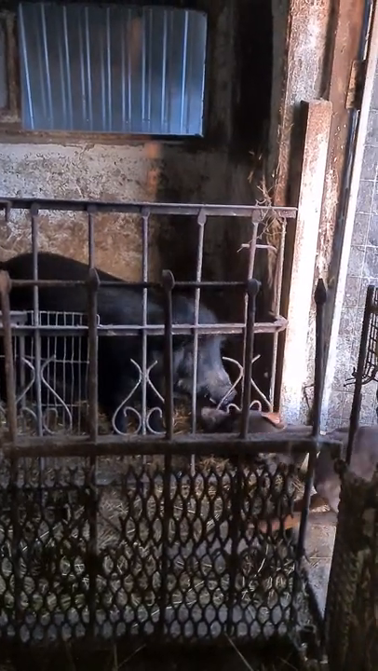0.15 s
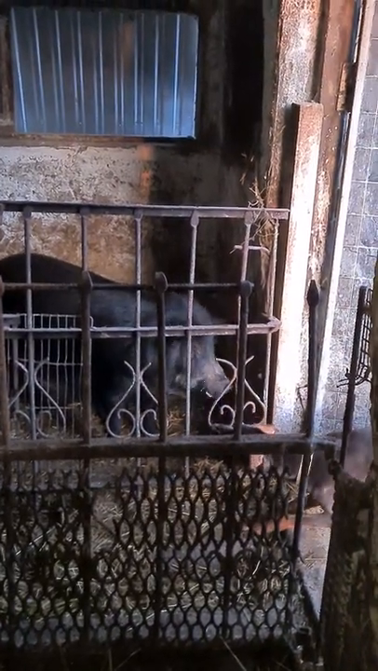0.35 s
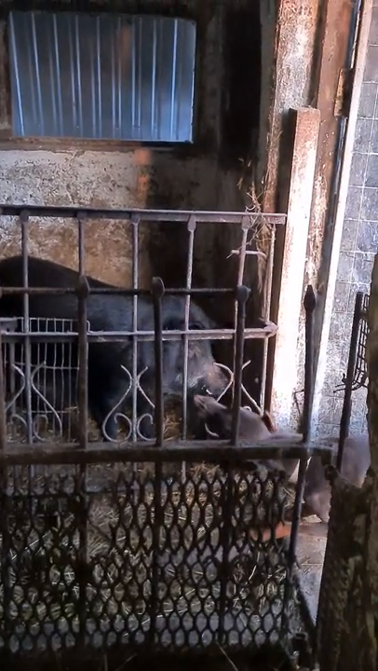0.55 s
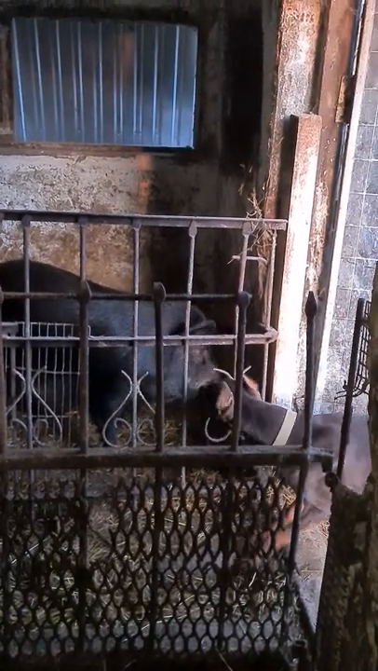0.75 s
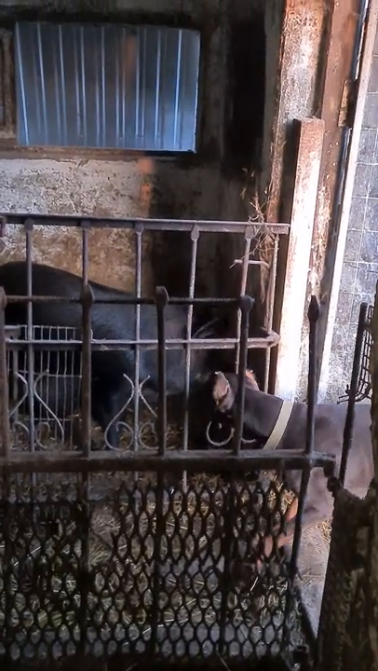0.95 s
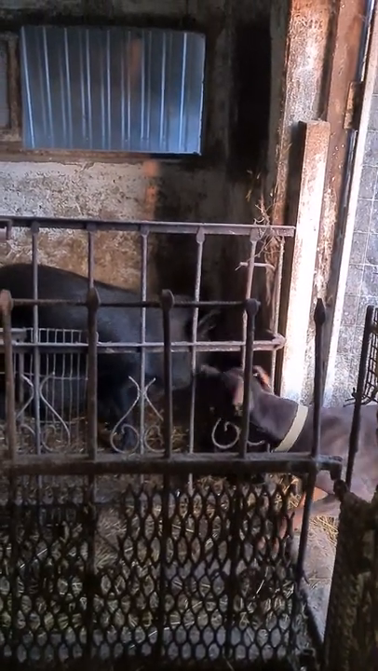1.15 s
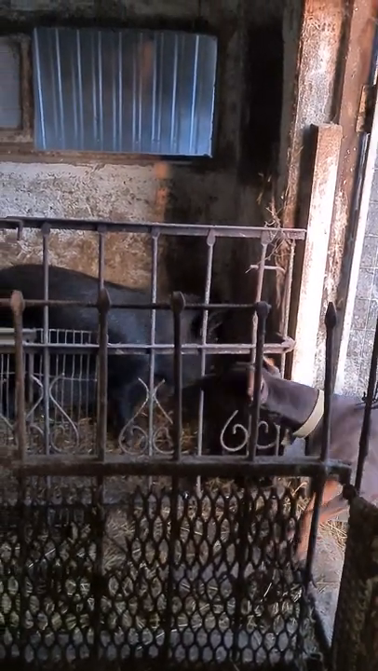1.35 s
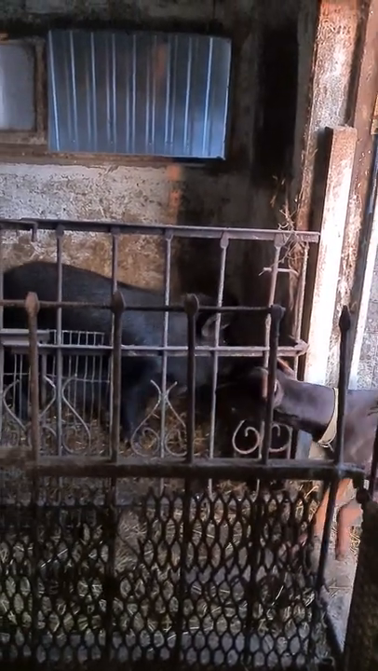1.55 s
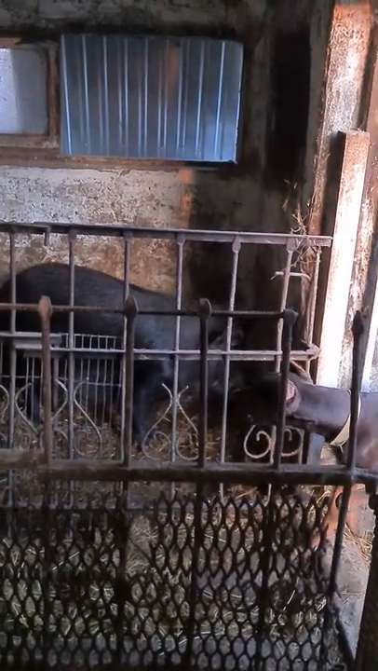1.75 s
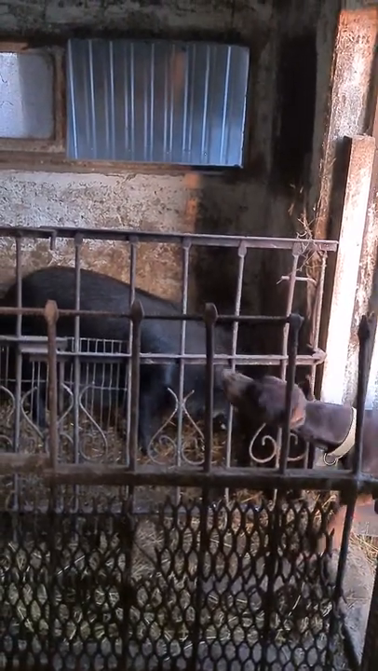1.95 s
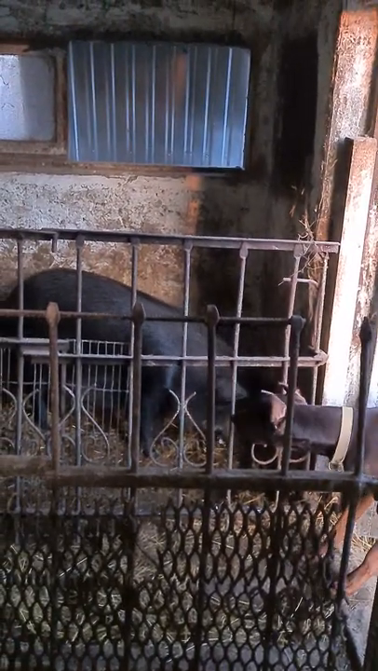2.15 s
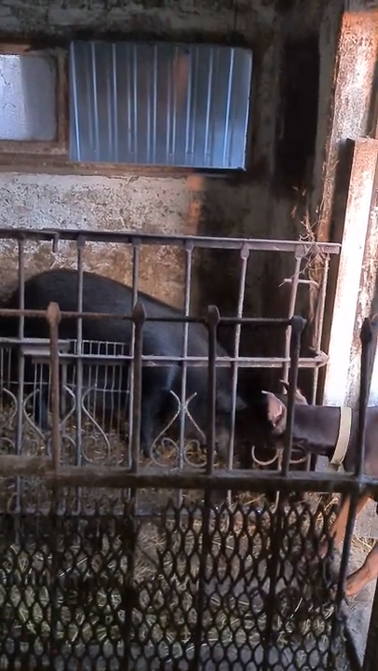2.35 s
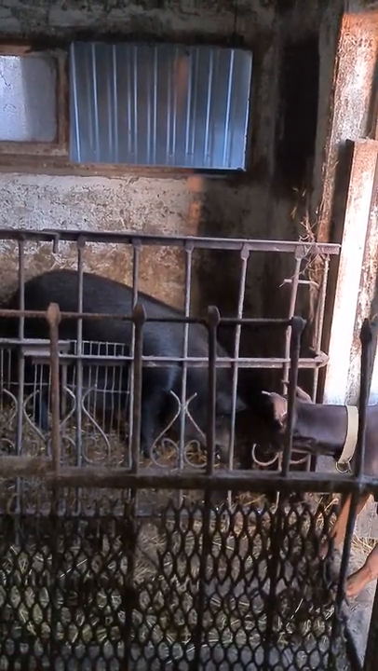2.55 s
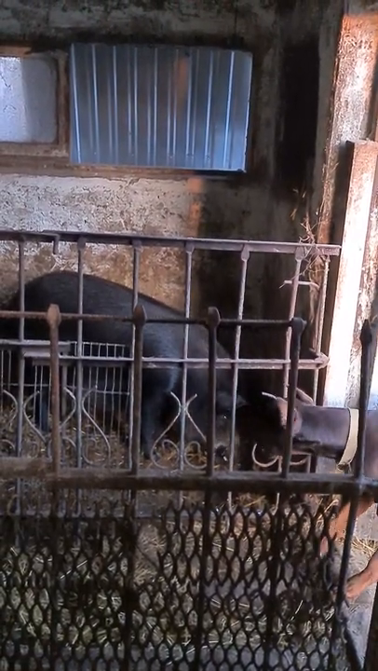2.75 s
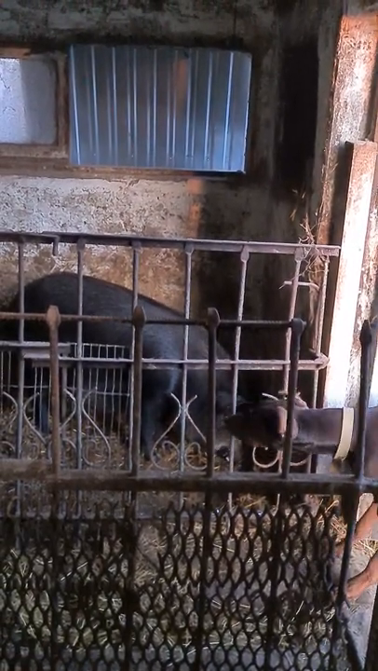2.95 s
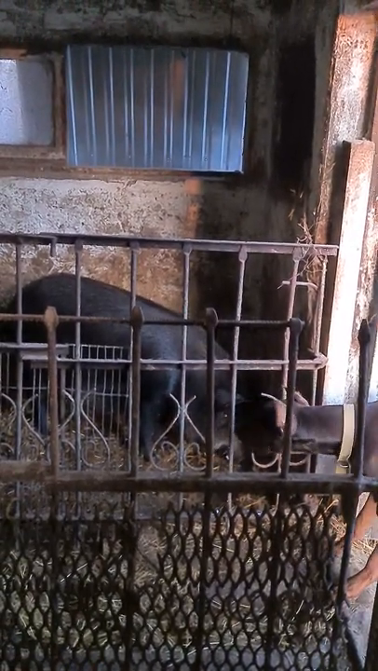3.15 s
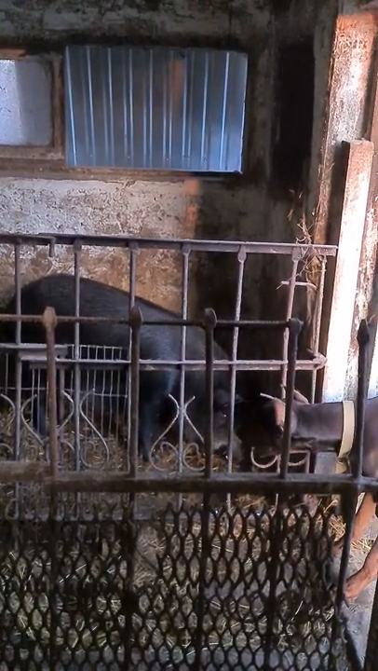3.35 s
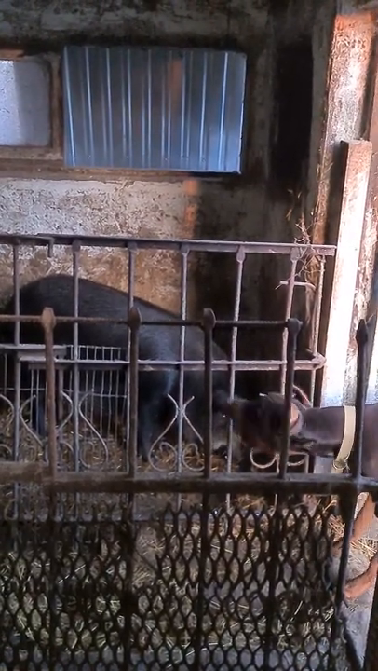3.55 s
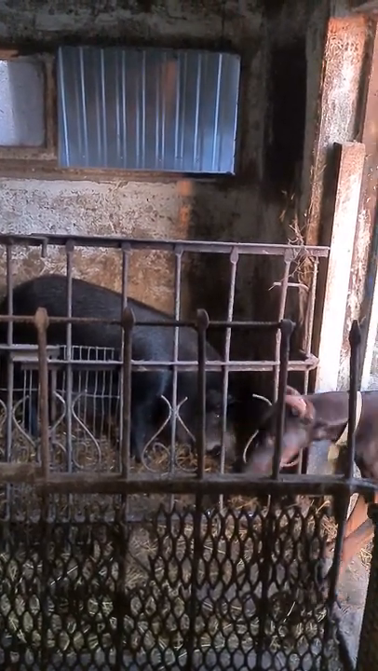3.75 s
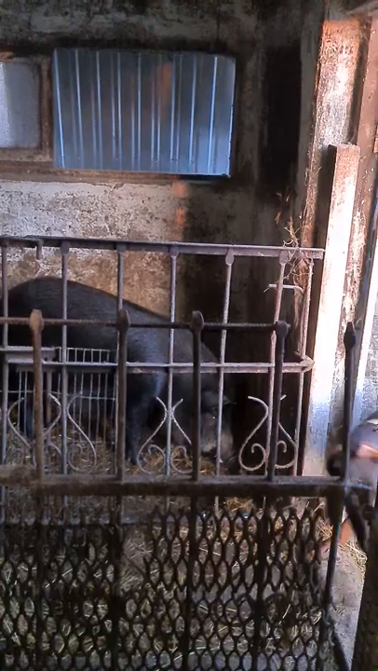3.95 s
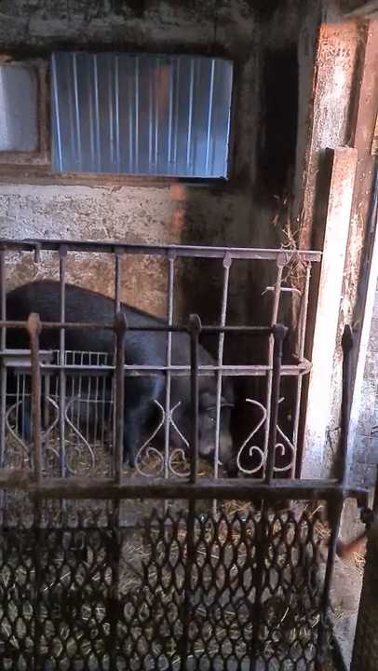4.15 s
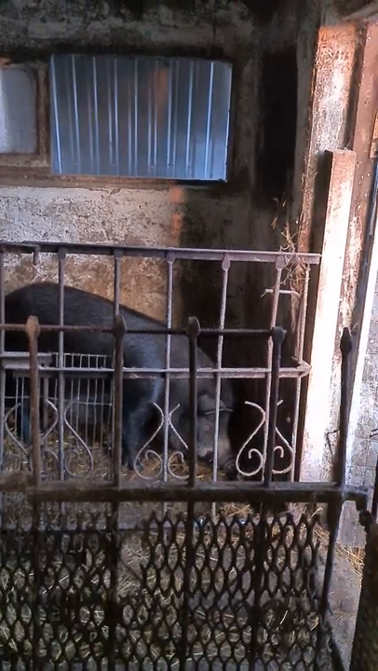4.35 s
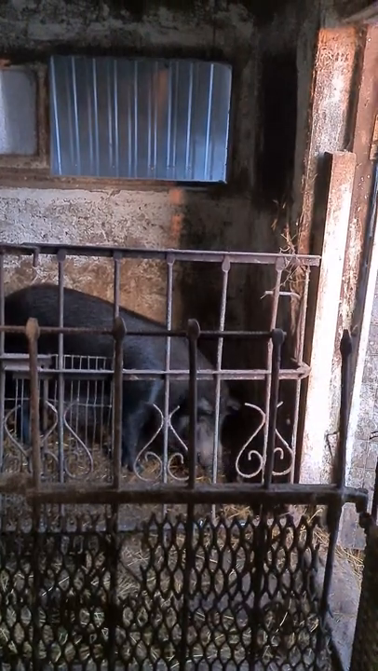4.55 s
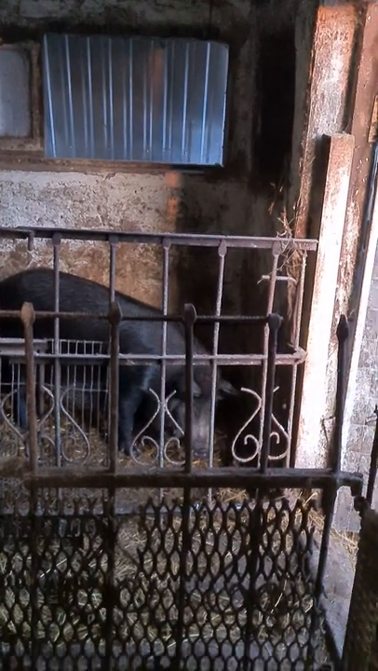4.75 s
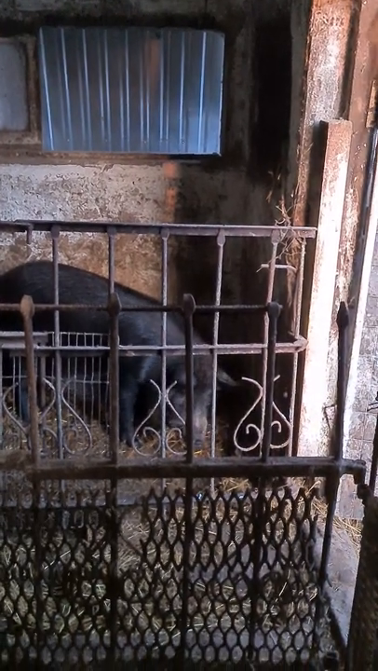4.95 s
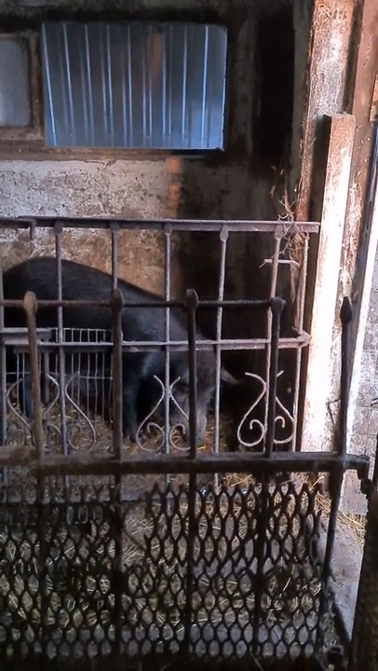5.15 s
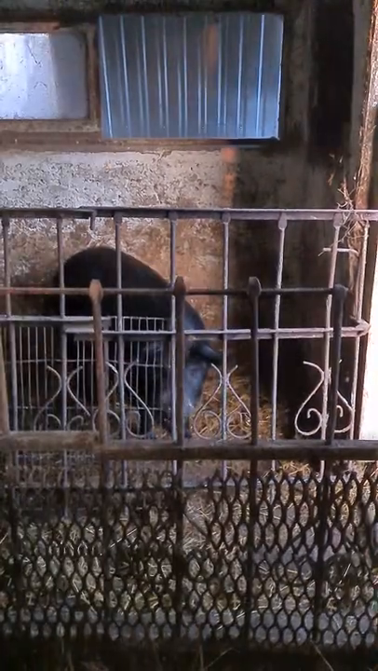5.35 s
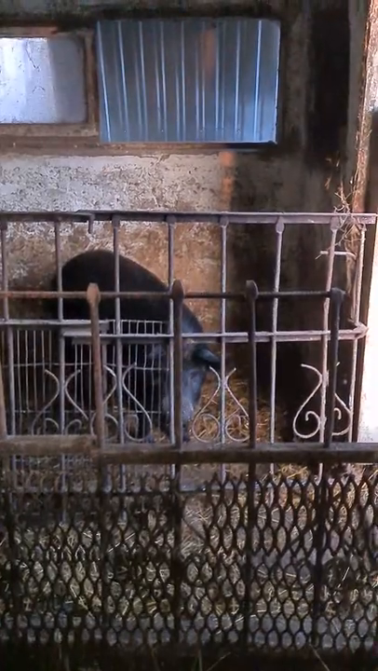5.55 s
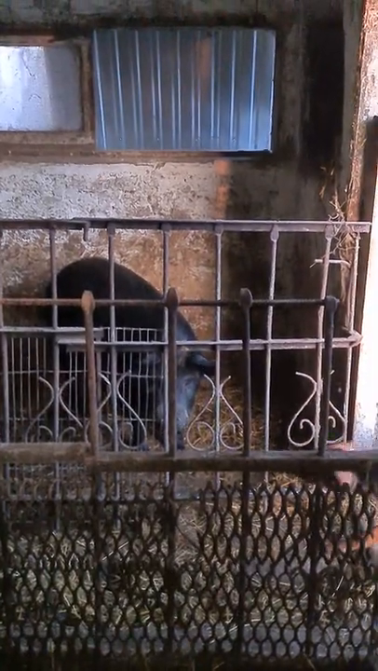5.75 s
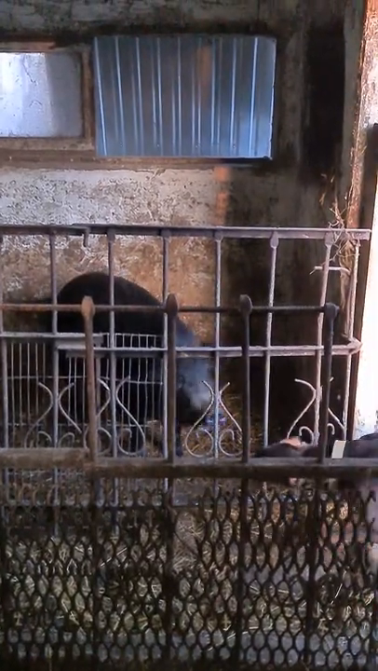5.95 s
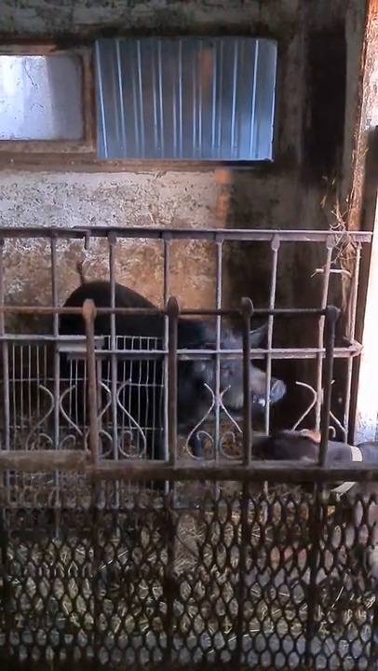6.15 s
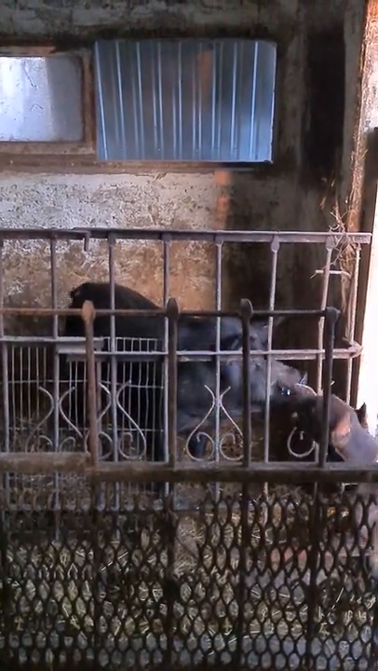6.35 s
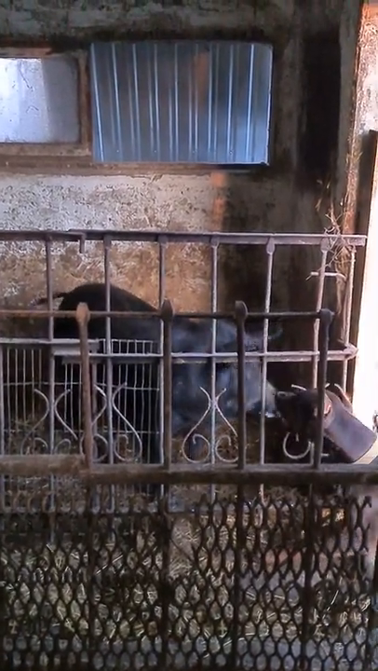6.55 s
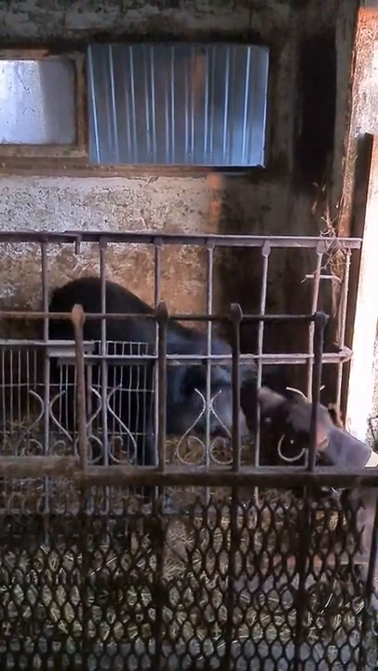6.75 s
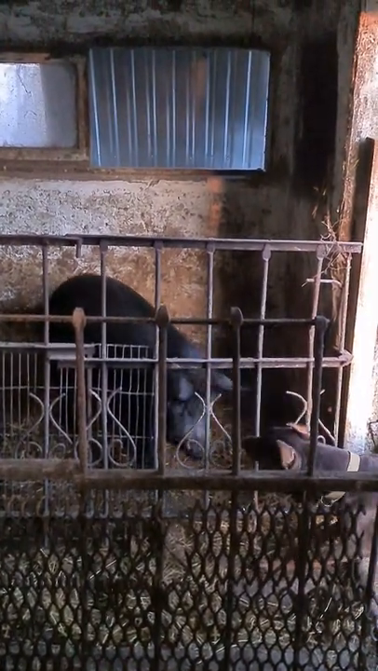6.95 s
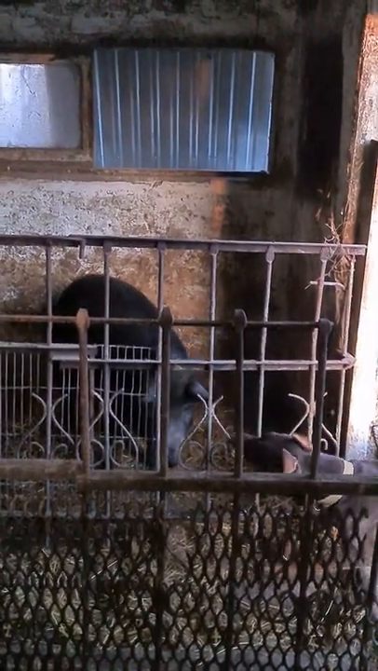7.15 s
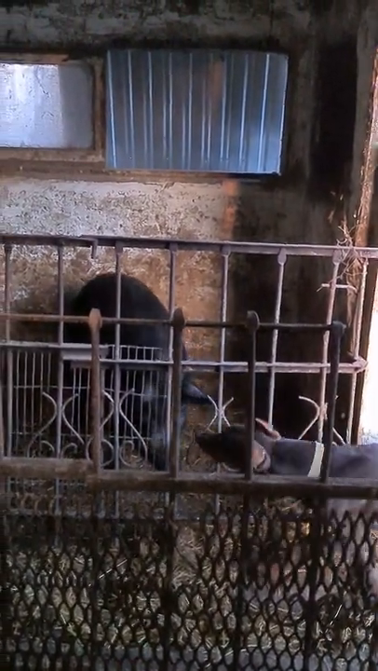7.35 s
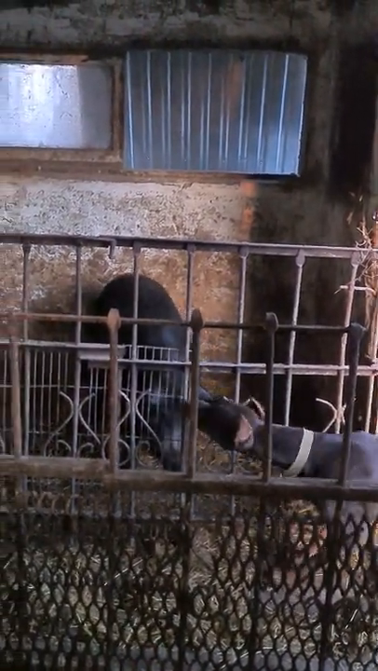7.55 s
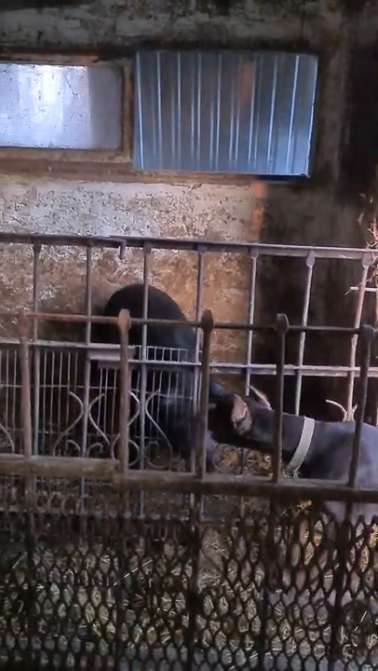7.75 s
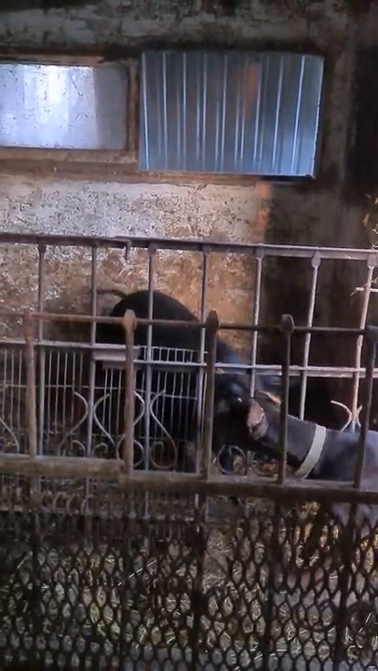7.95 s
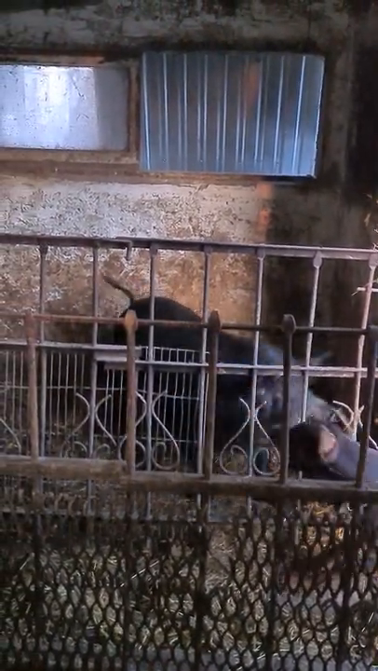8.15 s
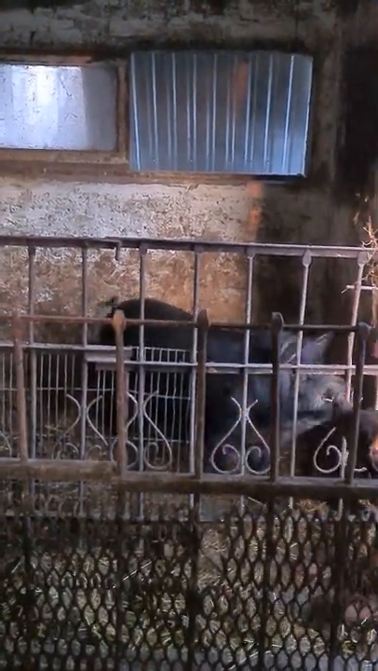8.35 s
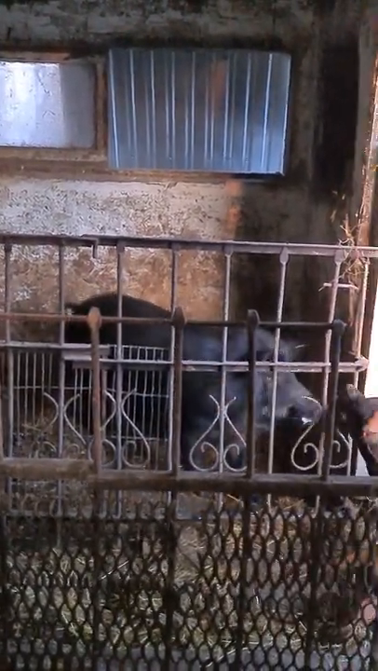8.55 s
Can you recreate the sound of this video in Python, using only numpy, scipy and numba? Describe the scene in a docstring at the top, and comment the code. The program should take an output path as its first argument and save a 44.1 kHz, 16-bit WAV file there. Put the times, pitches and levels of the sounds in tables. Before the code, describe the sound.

Short, hoarse dog barks echo off stone walls, pause, then return faster with growls and a straw scuff, over faint engine hum.

```python
"""Small stone stable: a dog barks and growls at a pig (silent here) through the bars of a pen.
Each bark starts as a closed-mouth tone, opens into a shout of harmonics and air, rougher in some than in others,
and drops in pitch. Growls are uneven fold pulses through a nearly closed mouth. Decaying noise and a few modes
make the walls ring. Straw is scuffed once as bursts of snaps; a distant engine hums as wavering low orders.
The recorder's gain control ducks at loud peaks and creeps back."""
import sys
import numpy as np
from scipy import signal
from scipy.fft import rfft, irfft, next_fast_len
from scipy.io import wavfile
from scipy.ndimage import uniform_filter1d, minimum_filter1d
from numba import njit

SR = 44100
rng = np.random.default_rng(int(sys.argv[2]) if len(sys.argv) > 2 else 0)


def generate_wav(sig):
    """Save sig (samples, or channels by samples) to the path in sys.argv[1] as 16-bit PCM at SR."""
    pcm = np.round(np.clip(np.atleast_2d(sig).T, -1, 1) * 32767).astype(np.int16)
    wavfile.write(sys.argv[1], SR, pcm)


N = 383229
TIME = np.arange(N) / SR
GROWL_HZ = 120.8  # start of each growl; bark trails fall towards it


def amp(db):
    """Converts dB to an amplitude factor."""
    return 10 ** (np.asarray(db) / 20)


def unit(x):
    """Scales x to rms 1."""
    return x / np.sqrt(np.mean(x ** 2) + 1e-20)


def read(points, hz):
    """Joins the points of a spectrum on a log-frequency axis."""
    point_hz, value = np.transpose(points)
    return np.interp(np.log(hz + 1), np.log(point_hz + 1), value)


def add(mix, start_s, sound):
    """Adds sound into mix at start_s, cut at the end of mix."""
    part = mix[max(round(start_s * SR), 0):][:len(sound)]
    part += sound[:len(part)]


def colour(x, points):
    """Filters x by a spectrum in dB."""
    size = next_fast_len(x.shape[-1] + 2048, real=True)
    gain = amp(read(points, np.fft.rfftfreq(size, 1 / SR)))
    return irfft(rfft(x, size) * gain, size)[..., :x.shape[-1]]


def wander(size, hz):
    """Slow random curve, rms about 0.8: normal draws at 2 * hz per second joined by lines."""
    at = np.arange(size) * hz * 2 / SR
    return np.interp(at, np.arange(512), rng.standard_normal(512))


def pair(x):
    """Makes two unrelated signals alike in the bass, as two close microphones hear a diffuse field."""
    # left-right likeness: hz, likeness_0_to_1
    likeness = [(60, 0.99), (200, 0.97), (400, 0.61), (1000, 0.34), (2500, 0.1)]
    size = next_fast_len(x.shape[1], real=True)
    a, b = rfft(x, size)
    same = np.clip(read(likeness, np.fft.rfftfreq(size, 1 / SR)), 0, 1)
    right = same * a + np.sqrt(1 - same ** 2) * b
    return irfft(np.array([a, right]), size)[:, :x.shape[1]]


def bark(length_s, effort_db, top_hz, rough, bright_db, attack_s,
         crest=.24, hold=0.7, jitter=0.04, shimmer=0.84, half_db=-0.5, air_db=-10,
         open_db=-1, shut_db=-19, fade=0.59, closing=0.13, hiss_db=-27.5):
    """Vocal folds start clean; as the mouth opens, overtones rise and the folds break into ragged cycles."""
    # open throat: hz, level_db
    throat = [(100, -45), (260, -28), (330, -20), (420, 1.5), (520, 0), (620, -3.5), (850, -5),
              (1100, -8.5), (1380, -8.5), (1650, -11), (2000, -16.5), (2280, -28.5), (2500, -32),
              (2750, -33.5), (3300, -60.5)]
    # rush of air through the throat: hz, level_db
    air_rush = [(100, -61.5), (170, -36), (260, -23.5), (330, -13), (430, 0.5), (600, -4), (800, 0.5),
                (1100, -8), (1650, -10.5), (2200, -11.5), (2600, -33), (3500, -39), (6000, -37.5),
                (8000, -50.5), (16000, -51)]
    open_clean_s, open_rough_s = 0.074, 0.0055  # a clean bark's mouth opens slowly, a rough one's at once
    # shares of the top pitch; the drop at the break grows with roughness
    scoop, drop, drop_rough, sink_per_s = 0.225, 0.0456, 0.1278, 0.703
    drop_s = 0.0357

    t = np.arange(0, length_s, 1 / SR)
    u, size = t / length_s, len(t)
    rough = np.clip(rough, 0, 1)
    opened = np.clip(t / (open_clean_s * (1 - rough) + open_rough_s * rough), 0, 1)
    ending = np.clip((u - fade) / (1 - fade), 0, 1)
    mouth = opened * (1 - closing * ending ** 2)  # the jaw drops, then starts to shut
    ragged = rough * opened ** 2

    # pitch: scoop up, drop when the folds break, then sink on
    break_at = crest + hold * np.clip(1 - rough, .05, .9) ** 2  # sooner in a rough bark
    rise = np.sin(np.pi / 2 * np.clip(u / crest, 0, 1))
    broken_s = np.maximum(t - break_at * length_s, 0)
    fall = np.sin(np.pi / 2 * np.minimum(broken_s / drop_s, 1)) ** 2
    scooped = scoop * (1 - rough) * (1 - rise)
    dropped = (drop + drop_rough * rough) * fall
    hz = top_hz * (1 - scooped - dropped - sink_per_s * broken_s)
    hz = hz * (1 + jitter * (ragged + 0.33) * wander(size, 149.96))
    phase = 2 * np.pi * np.cumsum(hz) / SR

    overtones = amp(bright_db + open_db + shut_db * (1 - mouth))
    voice = np.zeros(size)
    for k in np.arange(2, 13) / 2:
        share = 1 if k % 1 == 0 else ragged ** 1.27 * amp(half_db)  # half lines: strong-weak cycles
        line = amp(read(throat, k * hz)) * np.sin(k * phase + 2 * np.pi * rng.random())
        level = share * (1 if k == 1 else overtones)
        voice += level * line * (1 + shimmer * np.sqrt(ragged) * wander(size, 59.7))
    puffs = rng.standard_normal(SR // 2)[:size] * (1 + 0.56 * np.cos(phase))  # air escapes once a cycle
    voice += amp(air_db) * (ragged + 0.54) * overtones * unit(colour(puffs, air_rush))

    push = np.sin(np.pi / 2 * np.clip(t / attack_s, 0, 1)) ** 2 * np.cos(np.pi / 2 * ending)
    push = push * (1 - 0.24 * ragged)  # the voice loses power as it breaks
    flow = np.sin(np.pi * u ** 1.05) ** 2.18  # peaks just after mid-bark
    breath = amp(hiss_db) * (0.059 + rough ** 2) * flow * hiss(size)
    return amp(effort_db) * (voice * push + breath)


def hiss(size, patchy_db=7.0):
    """Air over wet teeth and tongue: noise whose bands flicker separately."""
    # air past the teeth: hz, level_db
    teeth = [(1000, -16), (2700, 10.5), (3500, -7), (4300, -1.5), (5200, 3.5), (6300, -1.5), (7300, -9.5),
             (8300, -7.5), (9600, -4), (10600, -31), (11900, -9.5), (13000, -20), (16000, -22.5)]
    hz, _, z = signal.stft(rng.standard_normal(SR // 2), SR, nperseg=256)
    patches = uniform_filter1d(rng.standard_normal(z.shape), size=6, axis=0)
    patches = unit(uniform_filter1d(patches, size=6, axis=1))
    z = z * amp(read(teeth, hz)[:, None] + patchy_db * patches)
    return unit(signal.istft(z, SR, nperseg=256)[1][:size])


def trail(effort_db, glide_s=0.087, jitter=0.14):
    """As breath runs out, the slackening folds hum on in a falling, fading chest tone."""
    length_s, start_hz, level_db = 0.1, 234, -47.5  # level relative to the bark's effort
    t = np.arange(0, length_s, 1 / SR)
    hz = GROWL_HZ + (start_hz - GROWL_HZ) * np.exp(-t / glide_s)
    hz = hz * (1 + jitter * wander(len(t), 66))
    tone = np.sin(2 * np.pi * np.cumsum(hz) / SR)
    return amp(effort_db + level_db) * tone * signal.windows.tukey(len(t), .6)


def growl(length_s, level_db, jitter=0.05, noise=0.14):
    """Slow uneven fold pulses: a sinking chest tone, and a mouth rasp that swells towards the end."""
    # resonances of the nearly closed mouth: hz, width_hz, level_db
    snarl = [(167.7, 146, -8), (490, 180, 5), (1080, 180, -4), (1635, 260, -12), (2180, 120, -15)]
    sink_hz_per_s, chest_db = 35, -15
    size = round(length_s * SR)
    u = np.linspace(0, 1, size)
    hz = (GROWL_HZ - sink_hz_per_s * length_s * u) * (1 + jitter * wander(size, 60))
    turns = np.cumsum(hz) / SR
    breath = noise * np.exp(-2 * (turns % 1)) * rng.standard_normal(SR)[:size]
    pulses = np.diff(np.floor(turns), prepend=0) + breath
    rasp = 0
    for centre_hz, width_hz, db in snarl:
        b, a = signal.iirpeak(centre_hz, centre_hz / width_hz, SR)
        rasp = rasp + amp(db) * signal.lfilter(b, a, signal.lfilter(b, a, pulses))
    chest = amp(chest_db) * np.sin(2 * np.pi * turns)
    sound = chest + unit(rasp) * (0.31 + u ** 3.3)
    return amp(level_db) * sound * signal.windows.tukey(size, .2)


def scuff(level_db, decay_s, rise_s=0.0023):
    """Feet scraping straw: a burst of tiny random snaps that dies away."""
    # straw: hz, level_db
    straw_db = [(100, -1), (500, 1), (900, -2), (1500, 4.5), (2200, 2), (3000, -7), (6500, -14.5),
                (9000, -18.5), (16000, -42)]
    t = np.arange(SR // 3) / SR
    snaps = rng.standard_normal(len(t)) * amp(4.5 * np.minimum(rng.exponential(1, len(t)), 4))
    envelope = np.exp(-t / decay_s) * (1 - np.exp(-t / rise_s))
    return amp(level_db) * unit(colour(snaps, straw_db)) * envelope


def stable(x, gap_s=0.0037, build_s=0.0047):
    """Reflections from stone walls build up, then die band by band, leaving a few ringing tones."""
    # ring time: hz, t60_s
    ring = [(120, 0.47), (500, 0.38), (1200, 0.31), (2400, 0.28), (6000, 0.22), (14000, 0.13)]
    # strength of the ring: hz, level_db
    wet = [(120, 5), (300, 8.5), (500, -3), (1000, 5), (2500, 4.5), (6000, 8.5), (14000, 10.5)]
    # resonances between the walls: hz, level_at_resonance_db, t60_s
    wall_modes = [(471, -0.5, 0.25), (840, 11, 0.41), (1325, 3.5, 0.53)]
    hz, t, z = signal.stft(pair(rng.standard_normal((2, SR))), SR, nperseg=256)
    t60_s = read(ring, hz)[:, None]
    decay = amp(read(wet, hz)[:, None] - 60 * t / t60_s)
    z = z * decay * np.sqrt(2 * np.log(1000) / t60_s / SR)
    tail = signal.istft(z, SR, nperseg=256)[1][:, :SR]
    t = TIME[:SR]
    for mode_hz, db, t60_s in wall_modes:
        mode = amp(db - 60 * t / t60_s) * np.cos(2 * np.pi * mode_hz * t)
        tail = tail + mode * 2 * np.log(1000) / t60_s / SR
    tail = tail * np.clip((t - gap_s) / build_s, 0, 1)
    return signal.fftconvolve(x[None], tail, axes=1)[:, :N]


def engine(hz=81, waver=0.018, flutter=0.25, rumble_db=-14):
    """Distant engine: a few wavering low orders over a soft rumble, with two swells; the low rumble of the
    second also carries the pig's lunge."""
    # hum: order_multiple, level_db
    engine_orders = [(1, -2.5), (2, -15), (4, -12)]
    # hum and low rumble swell; the second swell is mostly the thudding of the pig's lunge near 8.1 s: middle_s,
    # half_length_s, boost_db
    engine_swells = [(5.38, 0.19, 2.7), (8.08, .24, 6.8)]
    # rumble: hz, level_db
    rumble_spectrum = [(20, -13), (35, -10), (55, 4), (110, -1), (250, -22), (500, -52.5)]
    steady_db = -38.5
    phase = 2 * np.pi * np.cumsum(hz * (1 + waver * wander(N, 3.3))) / SR
    lines = np.zeros(N)
    for k, db in engine_orders:
        lines += amp(db) * np.sin(round(k) * phase) * (1 + flutter * wander(N, 8.4))
    rumble = amp(rumble_db) * unit(colour(rng.standard_normal(N), rumble_spectrum))
    swell_db = sum(db * np.exp(-np.square((TIME - s) / half_s) ** 2) for s, half_s, db in engine_swells)
    return amp(steady_db + swell_db) * (unit(lines) + rumble)


def ambience(level_db=-35, swell_db=2.4):
    """Outdoor rumble and hiss: coloured stereo noise at a slowly wavering level."""
    # outdoor background: hz, density_db_per_hz
    outdoors = [(20, -4.5), (55, 9), (110, 7.5), (180, 7.5), (260, -3), (400, -1), (600, 1.5), (1000, -1.5),
                (1800, -6), (2600, -5), (3500, -3.5), (5000, -8.5), (7500, -8.5), (10000, -15),
                (16000, -15)]
    air = unit(colour(pair(rng.standard_normal((2, N))), outdoors))
    return air * amp(level_db + swell_db * wander(N, 1.526))


def scene():
    """Dog and straw ring in the stable, over the outdoor background and engine."""
    # one row a bark, the first only the end of one:
    # start_s, length_s, effort_db, top_pitch_hz, roughness_0_to_1, overtones_db, attack_s
    barks = [ (0.0, 0.022, 2.5, 490, .6, 9, 0.00067), (0.086, .12, 13.5, 560.5, 0.38, -4.5, 0.019),
             (0.465, .095, 11.5, 559.9, 0.21, -1, 0.029), (1.144, .135, 8.5, 541.9, 0.61, -2, 0.017),
             (1.898, 0.12, 10, 581.2, 0.72, -2, 0.012), (2.796, 0.11, 9.5, 565, 0.64, -2, 0.012),
             (3.518, 0.14, 7.5, 558.8, 0.58, -3.5, 0.022), (5.532, 0.13, 10, 583.4, 0.89, -5, 0.054),
             (5.766, 0.15, 8, 564.5, 0.71, -2.5, 0.03), (6.025, 0.11, 10, 555.3, .36, -2.5, .03),
             (6.348, 0.099, 8, 518.6, 0.17, -4.5, 0.048), (6.686, 0.12, 7.5, 556.3, .24, 3, 0.03),
             (7.168, .125, 11, 565.6, 0.68, -2.5, 0.021), (7.429, 0.17, 7, 519, 0.6, -0.5, 0.038),
             (8.188, 0.19, 2.5, 541, 0.21, 3, 0.064), (8.514, .2, 10.5, 523.7, 0.44, -2, 0.13), ]
    # growls: start_s, length_s, level_db
    growls = [(0.29, 0.21, -15.5), (5.70, 0.076, -8.5), (6.19, 0.17, -13.5), (6.49, 0.34, -17),
              (7.331, 0.132, -8.5), (8.082, 0.17, -8), (8.43, 0.13, -14.5)]
    # feet in the straw: start_s, level_db, decay_s
    scuffs = [(7.917, -18.5, 0.031), (7.975, -36, 0.03), (8.045, -30.5, 0.034)]
    # dog's side of the stable, brighter on the right: hz, level_db
    dog_side = [(100, -.5), (450, 0.25), (1200, 2.77), (2300, 2.7), (3500, 3), (5000, 8.5), (16000, 10.5)]
    dog, straw = np.zeros(N), np.zeros(N)
    for start_s, length_s, effort_db, *voice in barks:
        add(dog, start_s, bark(length_s, effort_db, *voice))
        add(dog, start_s + length_s, trail(effort_db))
    for start_s, *row in growls:
        add(dog, start_s, growl(*row))
    for start_s, *row in scuffs:
        add(straw, start_s, scuff(*row))
    near = dog + straw
    left, right = near + stable(near)
    return np.array([left, colour(right, dog_side)]) + ambience() + engine()


@njit
def recover(allowed, gain, step):
    """The gain drops at once to what is allowed and creeps back, in dB, towards 1."""
    out = np.empty(len(allowed))
    for i in range(len(allowed)):
        gain = min(allowed[i], gain ** (1 - step))
        out[i] = gain
    return out


def record(dry, ceiling=0.99, recovery_s=1.357, first_gain=0.062, edge_hz=15750):
    """Port colour, a look-ahead gain control that holds the peaks, then the band limit."""
    # right microphone's port, ringing in the treble: hz, level_over_left_db
    right_port = [(100, 0.5), (500, 3), (1000, 1.5), (2800, 3.5), (3700, 4), (4500, 3), (5200, 5),
                  (6900, 10), (8300, -6), (9600, 5.5), (10700, 8.5), (11900, 15), (13500, 13.5),
                  (16000, 7.5)]
    x = np.array([dry[0], colour(dry[1], right_port)])
    allowed = minimum_filter1d(ceiling / np.maximum(abs(x).max(0), ceiling), size=200)
    gain = uniform_filter1d(recover(allowed, first_gain, 1 / (recovery_s * SR)), size=200)
    lowpass = signal.firwin(511, edge_hz, window=("kaiser", 9), fs=SR)
    return signal.oaconvolve(x * gain, lowpass[None], "same")


dry = scene()
out = record(dry)
generate_wav(out)
```